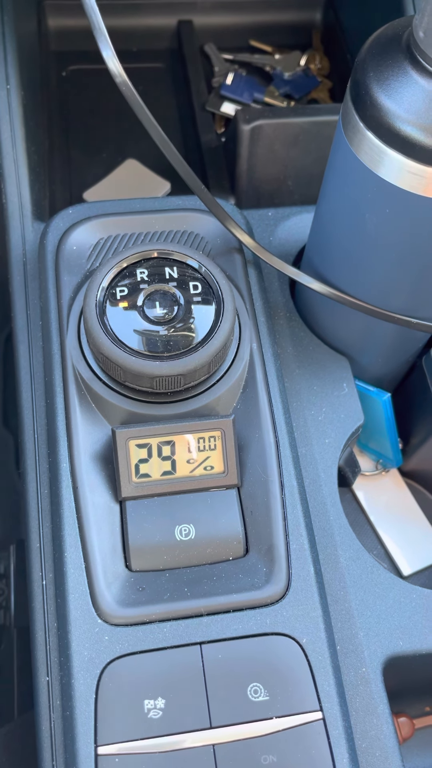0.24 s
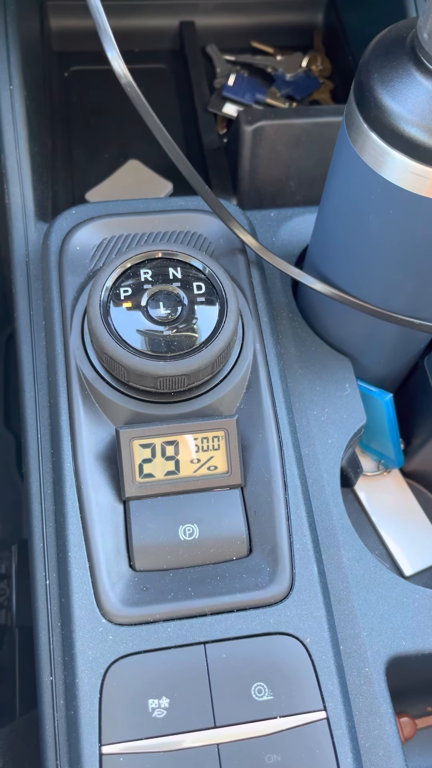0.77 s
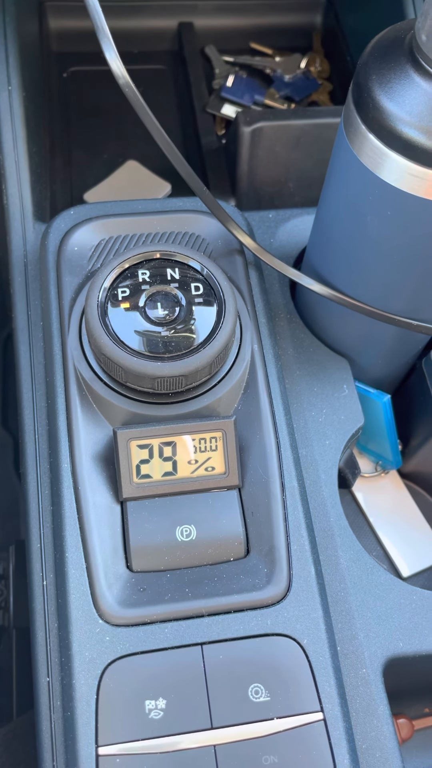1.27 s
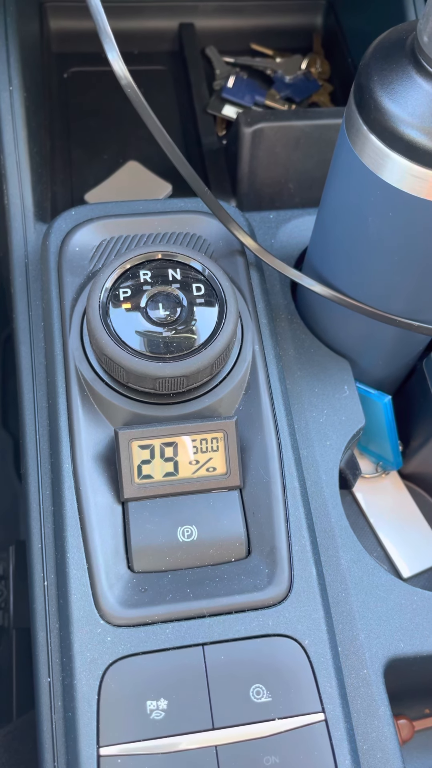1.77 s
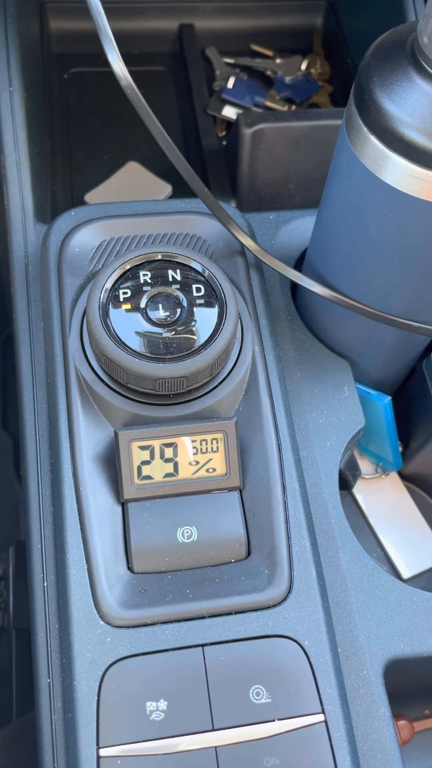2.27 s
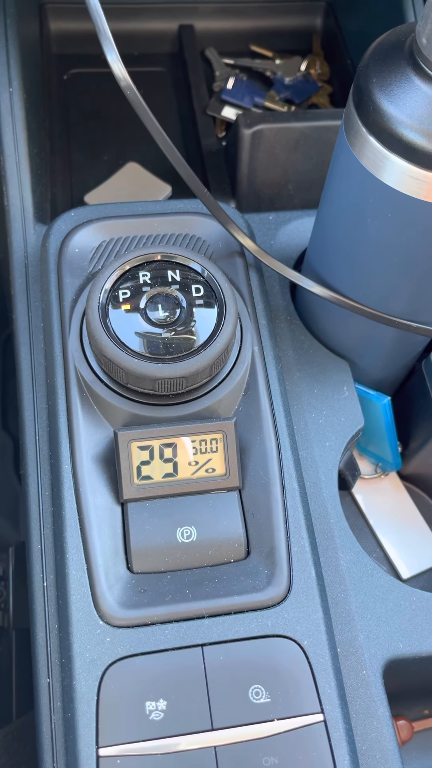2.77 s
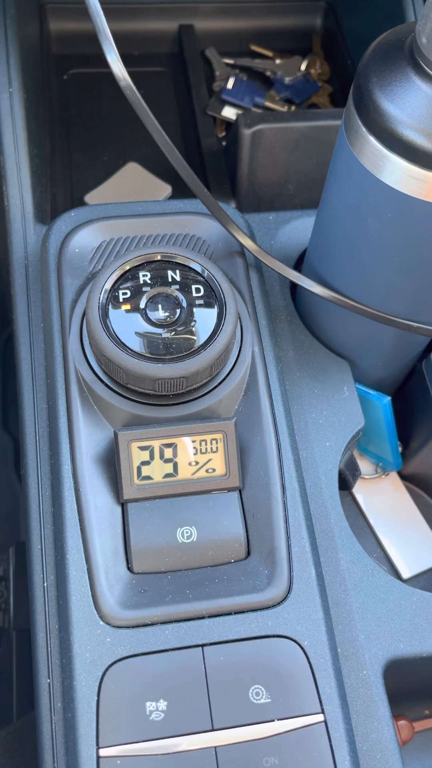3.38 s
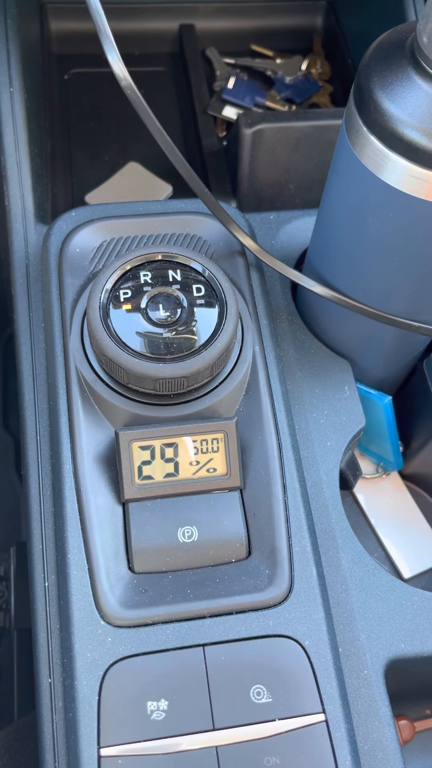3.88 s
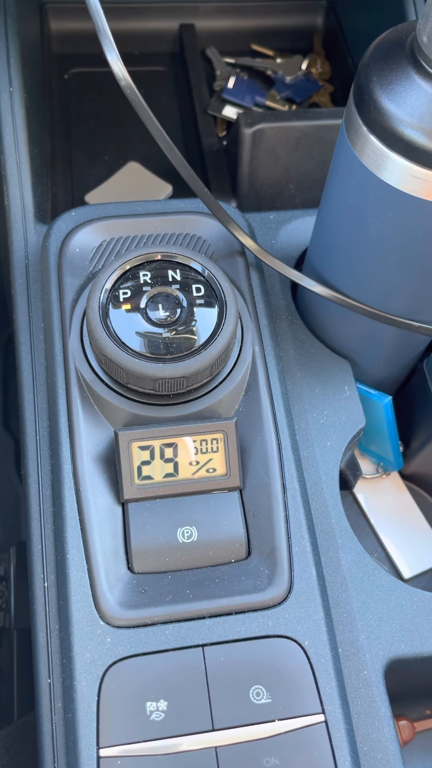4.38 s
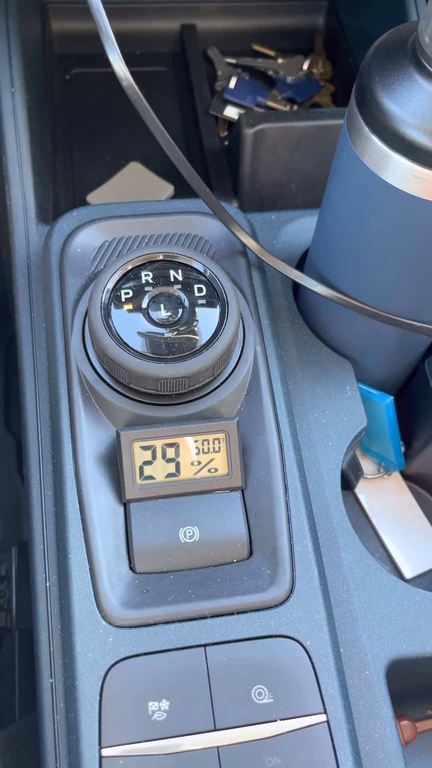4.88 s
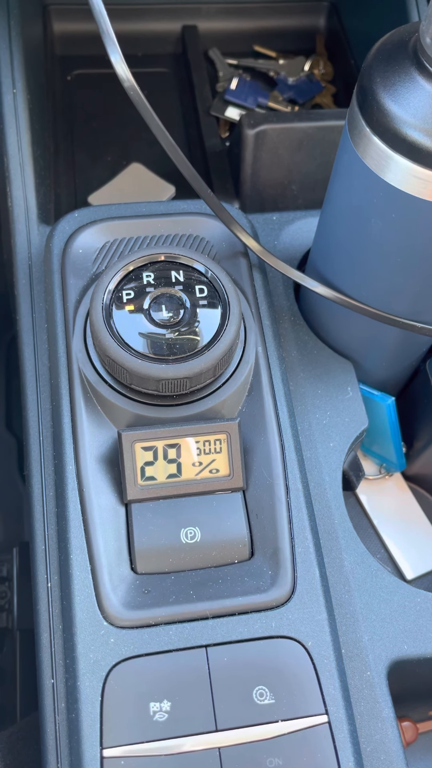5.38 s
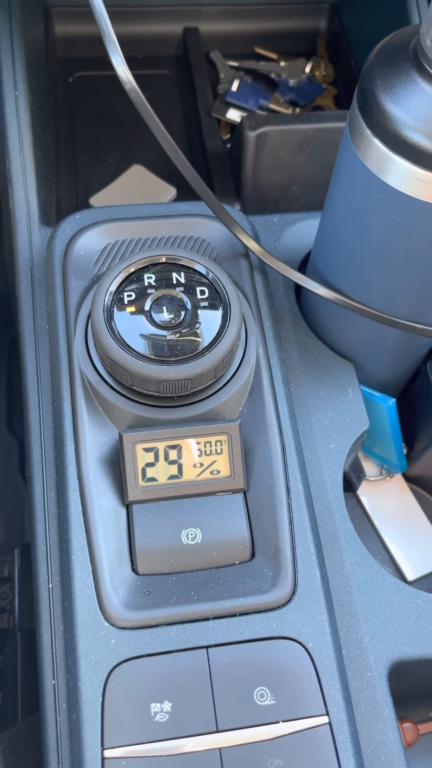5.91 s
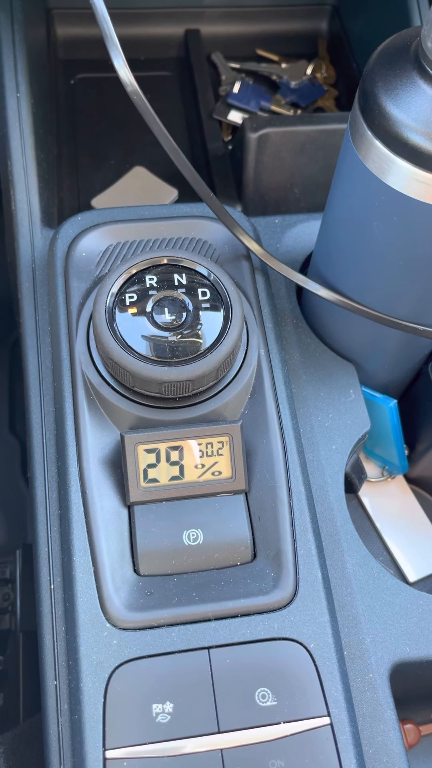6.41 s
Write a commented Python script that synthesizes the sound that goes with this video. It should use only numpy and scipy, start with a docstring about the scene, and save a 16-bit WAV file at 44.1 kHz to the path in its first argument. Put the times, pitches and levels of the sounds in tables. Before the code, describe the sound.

A car's heater fan rushes steadily inside the cabin, with a plastic snap and thud, then two low, booming engine revs.

```python
"""A steady rush of air: a heater blower on full drives turbulent flow through the vents of a parked car.
Early on a plastic part snaps, ringing the trim, and the panels answer with a thud; later it ticks.
The engine is revved twice and booms as its firing rate sweeps through the cabin's resonances.
A phone near the console picks this up at two microphone ports, with a phase difference between them."""
import sys
import numpy as np
from scipy import signal
from scipy.fft import rfft, irfft
from scipy.io import wavfile
from scipy.ndimage import uniform_filter1d

SR = 44100
rng = np.random.default_rng(int(sys.argv[2]) if len(sys.argv) > 2 else 0)


def output_pcm(signal):
    """Save a mono or channel-first signal as 16-bit PCM at the path in sys.argv[1].

    Samples are clipped to [-1, 1] before scaling.
    """
    pcm = np.clip(np.atleast_2d(signal).T, -1, 1) * 32767
    wavfile.write(sys.argv[1], SR, np.round(pcm).astype(np.int16))


N = 293265


def undb(db):
    """Amplitude ratio of a level in decibels."""
    return 10 ** (np.asarray(db) / 20)


def level(x, db):
    """Normalisation to an rms level in decibels."""
    return x * undb(db) / np.sqrt(np.mean(x ** 2))


def band(x, hz, width):
    """Second-order resonance with unit gain at its centre."""
    return signal.lfilter(*signal.iirpeak(hz, hz / width, SR), x)


def butterworth(x, order, hz, kind):
    """Filtering with a maximally flat passband."""
    return signal.sosfilt(signal.butter(order, hz, kind, fs=SR, output="sos"), x)


def walk(rate):
    """Random modulation: Gaussian values held for 1 / rate seconds and smoothed twice."""
    hold = int(SR / rate)
    steps = np.repeat(rng.standard_normal(N // hold + 1), hold)
    return 2.0 * uniform_filter1d(uniform_filter1d(steps, hold), hold)[:N]


def ports(direct, stray):
    """Partial coherence: direct sound reaches the two ports out of step; stray sound decorrelates them."""
    # relation between the ports: (frequency [Hz], phase lead of left [rad], coherence [0-1])
    port_relation = [(40, 0, 1), (90, 0, .995), (200, -.03, .995), (380, -.1, .97), (560, -.1, .55),
                     (700, -.3, .85), (950, -.9, .6), (1150, -.4, .75), (1850, 0, .97), (2450, .5, .65),
                     (2800, 1.8, .35), (3200, -.3, .45), (3900, 1.4, .55), (4650, 2.0, .5),
                     (4870, 3.14, .9), (5150, 4.5, .8), (5750, 6.15, .99), (6250, 6.4, .99),
                     (7300, 7.7, .85), (8400, 9.3, .99), (9600, 9.55, .99), (10500, 10.5, .85),
                     (11600, 12.1, .85), (12200, 12.57, .93)]
    hz = np.fft.rfftfreq(N, 1 / SR)
    knots_hz, lead, coherence = np.transpose(port_relation)
    shift = np.exp(.5j * np.interp(hz, knots_hz, lead))
    coherence = np.clip(np.interp(hz, knots_hz, coherence), 0, 1)
    common = np.sqrt((1 + coherence) / 2) * rfft(direct)
    opposed = np.sqrt((1 - coherence) / 2) * rfft(stray)
    spectra = np.array([(common + opposed) * shift, (common - opposed) / shift])
    return spectra, hz


def blower():
    """Source and filter: broadband turbulence is coloured by the resonances of ducts and cabin."""
    # spectrum of the rush as heard, with the treble cut off near 12 kHz:
    # (frequency [Hz], relative spectral density [dB])
    heard_spectrum = [(20, -18), (40, -15), (56, -9.8), (140, -12.3), (190, -15.6), (410, -20.9),
                      (560, -22.3), (1330, -26.0), (2450, -34.6), (2750, -37.7), (4700, -44.1),
                      (11300, -49.4), (11750, -56.3), (12300, -84.7)]
    # slow drift of the top treble: (time [s], gain [dB])
    treble_lift = [(0, -4), (.45, -4.5), (.75, -3), (1.8, -0.5), (2.1, 0), (4.1, 0.5), (4.3, 1), (4.6, 1.5),
                   (5.9, 0), (6.6, 0)]
    # duct and cabin peaks and dips: (frequency [Hz], bandwidth [Hz], left gain [dB], right gain [dB])
    ducts = [(68, 40, 8.5, 8.5), (102, 40, 7, 7), (165, 60, -2, -2.5), (245, 70, 11.5, 10.5),
             (297, 50, 8, 6.8), (352, 60, 8.5, 7.5), (470, 60, 4.5, 1), (560, 40, -3, -3),
             (600, 40, 2.5, 1.5), (668, 35, 3.5, 1), (703, 50, 11, 4.5), (770, 40, -1, -3),
             (850, 50, 3.5, -1.8), (890, 30, 0, 3.5), (940, 45, 6.5, 1.5), (995, 50, -1, 6.5),
             (1045, 40, 2, 2), (1110, 65, 8.5, 3), (1145, 35, 1.5, 4.5), (1165, 40, 1, 1), (1220, 70, 5, 0),
             (1300, 40, -2.5, -2.5), (1335, 60, 2, 1.5), (1385, 40, -3, -2.5), (1440, 55, 4, 5.3),
             (1745, 130, 2.5, 2.5), (1850, 60, -1.5, -1.5), (1945, 90, 4, 3.7), (2050, 80, -2, -2),
             (2180, 130, 4, 2), (2110, 50, -1.5, -1.5), (2260, 90, 2, 2), (2400, 110, 3.5, 2),
             (2485, 60, 3.5, 3.5), (2545, 50, -3, -3), (3090, 160, 3.8, 1), (3780, 270, 1.7, 5.5),
             (4425, 120, 8, 3), (4990, 150, 1.5, 1.5), (5750, 250, 1.6, 1.2), (7550, 300, -2, -2),
             (10450, 900, 3.8, 3.8)]
    air = rng.standard_normal((2, N))
    treble = butterworth(air, 2, 3000, "high")
    flutter = undb(0.2 * walk(6.4) + 0.71 * walk(40))
    air = air + treble * (flutter - 1)
    top = butterworth(air, 4, 8500, "high")
    drift = undb(np.interp(np.arange(N) / SR, *np.transpose(treble_lift)))
    air = air + top * (drift - 1)
    spectra, hz = ports(*air)
    heard_hz, heard_db = np.transpose(heard_spectrum)
    colour_db = np.interp(np.log(hz + 1), np.log(heard_hz), heard_db)
    resonance_db = sum(np.array([[left_db], [right_db]]) / (1 + (2 * (hz - centre) / width) ** 2)
                       for centre, width, left_db, right_db in ducts)
    return level(irfft(spectra * undb(colour_db + resonance_db), N), db=-30)


def snaps():
    """Impact excitation: bursts of tiny collisions ring the trim's modes; the cabin reverberates briefly."""
    # snaps and ticks of the plastic: (time [s], gain [dB], rattle length [s], low cutoff [Hz],
    # high cutoff [Hz], frequency struck hardest [Hz])
    impacts = [(0.372, -34, .004, 300, 4000, 1045), (0.5132, -19.5, 0.007, 300, 10000, 5620),
               (0.521, -31, 0.008, 300, 12000, 2640), (4.191, -35, 0.0065, 1200, 10500, 3640),
               (4.806, -36, 0.0043, 300, 4000, 1045)]
    # modes of the plastic trim: (frequency [Hz], bandwidth [Hz], gain [dB])
    trim_modes = [(700, 300, -5), (1034, 71, 10.5), (1595, 120, 12), (2580, 840, 0.5), (3610, 220, 1.5),
                  (5370, 870, -10), (8500, 2200, -4), (10700, 860, -9.5)]
    attack_s, tail_db, tail_t60_s, hardest_db = 0.00056, -14, .18, 9
    out = np.zeros((2, N))
    t = np.arange(int(.15 * SR)) / SR
    for onset_s, gain_db, length_s, low_hz, high_hz, hardest_hz in impacts:
        noise = rng.standard_normal((3, 2, len(t)))
        collisions = noise[0] * np.abs(noise[1])
        rattle = collisions * np.minimum(t / attack_s, 1) * np.exp(-(t / length_s) ** 2)
        tail = undb(tail_db) * noise[2] * np.exp(-np.log(1000) * t / tail_t60_s)
        ring = 0
        for hz, width, db in trim_modes:
            struck_hardest = abs(np.log2(hz / hardest_hz)) < 1 / 4  # within a quarter octave
            ring = ring + undb(db + hardest_db * struck_hardest) * band(rattle + tail, hz, width)
        start = int(onset_s * SR)
        out[:, start:start + len(t)] += undb(gain_db) * butterworth(ring, 3, (low_hz, high_hz), "band")
    spectra, _ = ports(*out)
    return irfft(spectra, N)


def thud():
    """Damped vibration: after a soft blow on the console, panel modes swell over a cycle and decay."""
    # panel modes, the lowest answering last: (frequency [Hz], gain [dB], delay [s], time to fall 60 dB [s])
    panel_modes = [(57, -14.5, 0.032, 0.4), (63, -13.5, 0.037, 0.4), (106, -9, 0.0025, 0.16),
                   (199, -20, 0.002, 0.3), (240, -17.5, 0.00087, 0.13), (305, -19, 0.002, 0.09),
                   (685, -29, 0.006, .06)]
    blow_s = .516
    out = 0
    for hz, gain_db, delay, t60 in panel_modes:
        t = np.maximum(np.arange(N) / SR - blow_s - delay, 0)
        envelope = (1 - np.exp(-t * hz)) * np.exp(-np.log(1000) * t / t60)
        out = out + undb(gain_db) * envelope * np.sin(2 * np.pi * hz * t)
    return out


def revving(t):
    """Inertia and resonance: the revs lag the pedal, hang, then coast; the boom's level follows them."""
    # throttle blips: (rise start [s], rise end [s], top firing rate [Hz],
    # firing rate as coasting begins [Hz], boom gain [dB])
    blips = [(1.505, 1.829, 98.2, 92.6, -23.5), (4.523, 4.94, 118.7, 104.6, -21.5)]
    # response of the cabin to the engine: (firing rate [Hz], gain [dB])
    cabin_response = [(46, -32.5), (53, -17), (59, -12.5), (66, -5.5), (72, -8), (77, -8.5), (84.5, -14.5),
                      (91, -2), (101, 0.6), (118, -2)]
    # change of the boom at full throttle: (firing rate [Hz], gain [dB])
    load_response = [(48, 16), (58, -3), (68, 7), (80, 4), (90, -6), (97, -5), (106, -11), (118, -9)]
    idle_hz, rise_skew, hang_s, coast_tau_s = 46.06, .78, .36, 1.95
    press_s, release_s, pedal_lead_s = 0.14, 0.22, 0.2
    hz, throttle = np.full(N, idle_hz), 0
    for start, end, top_hz, coast_hz, _ in blips:
        progress = np.clip((t - start) / (end - start), 0, 1)
        rise = (1 - np.cos(np.pi * progress ** rise_skew)) / 2
        sag = np.clip((t - end) / hang_s, 0, 1)
        coast = np.exp(-np.maximum(t - end - hang_s, 0) / coast_tau_s)
        hz = np.maximum(hz, (idle_hz + (top_hz - idle_hz) * rise - (top_hz - coast_hz) * sag) * coast)
        press = (t - start + pedal_lead_s) / press_s
        release = (end - pedal_lead_s / 2 - t) / release_s + 1
        throttle = throttle + np.clip(np.minimum(press, release), 0, 1)
    starts, *_, gains_db = np.transpose(blips)
    blip_db = gains_db[np.maximum(np.searchsorted(starts, t) - 1, 0)]
    cabin_db = np.interp(hz, *np.transpose(cabin_response))
    load_db = throttle * np.interp(hz, *np.transpose(load_response))
    return hz, throttle, blip_db + cabin_db + load_db


def engine():
    """Periodic forcing: a near-sine boom at the firing rate; throttle adds harmonics and intake growl."""
    # harmonics under load: (multiple of the firing rate [1], mean level at full throttle [dB])
    load_orders = [(2, -38), (3, -43), (4, -42)]
    half_order_db, lumpy_db, smooth_hz = -16, 5, 95
    intake_hz, growl_reference_hz, growl_exponent = (207, 400), 85, .8
    hz, throttle, boom_db = revving(np.arange(N) / SR)
    phase = 2 * np.pi * np.cumsum(hz * (1 + 0.0032 * walk(30.5))) / SR
    unevenness = np.clip(1 - hz / smooth_hz, 0, 1)  # a slower engine fires less evenly
    amplitude = np.sqrt(2) * undb(boom_db + 1.05 * walk(25.01) + lumpy_db * walk(9) * unevenness)
    half_order = undb(half_order_db + 2.2 * walk(4.4)) * np.sin(phase / 2)  # from unequal cylinders
    boom = amplitude * (np.sin(phase) + half_order)
    harmonics = sum(undb(db + 4 * walk(15)) * np.sin(k * phase + k) for k, db in load_orders)
    # intake noise, muffled by the bulkhead, pulses once a firing and swells with the revs
    suction = butterworth(rng.standard_normal(N), 3, intake_hz, "band")
    growl = level(suction * (1 + 0.34 * np.cos(phase)), db=-37)
    swell = (hz / growl_reference_hz) ** growl_exponent
    return boom + throttle * (harmonics + growl * swell)


def scene():
    """Superposition of the sources; the long waves of thud and engine reach both ports alike."""
    return blower() + snaps() + thud() + engine()


def record(dry):
    """Band limiting: the phone rolls off the deepest bass and cuts the top treble steeply."""
    bass_hz, top_hz = 37, 12900
    dry = butterworth(dry, 3, bass_hz, "high")
    return signal.sosfilt(signal.ellip(8, .2, 70, top_hz, fs=SR, output="sos"), dry)


dry = scene()
out = record(dry)
output_pcm(out)
```